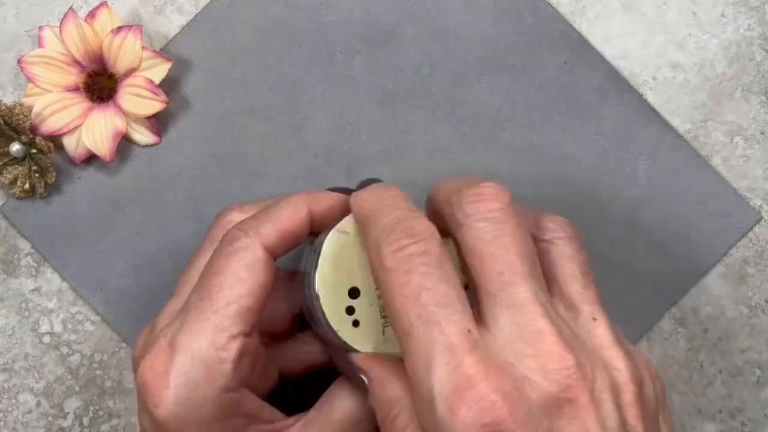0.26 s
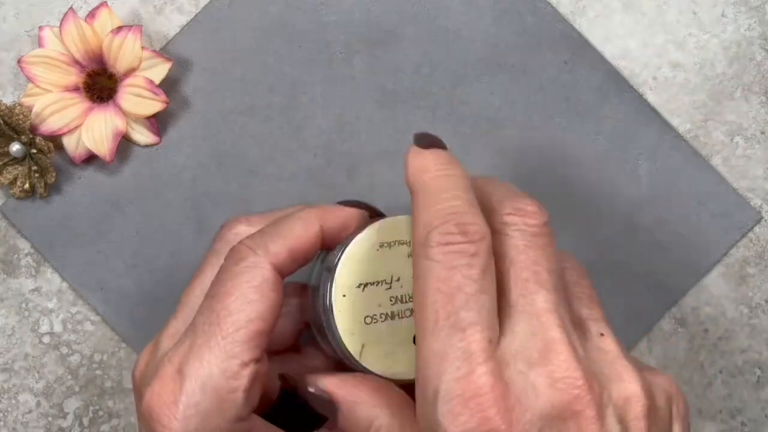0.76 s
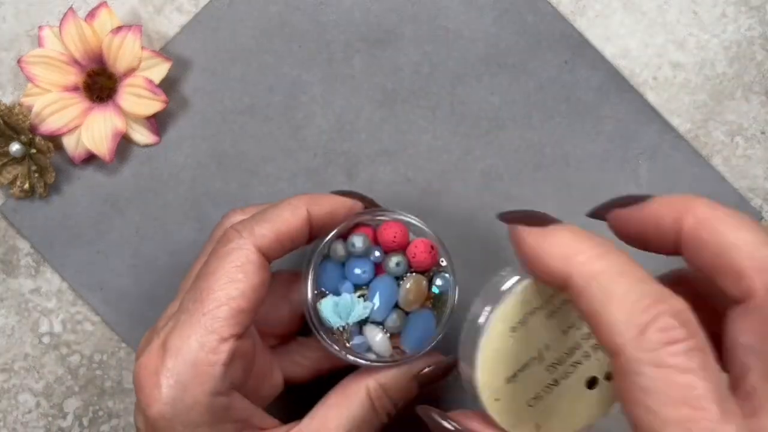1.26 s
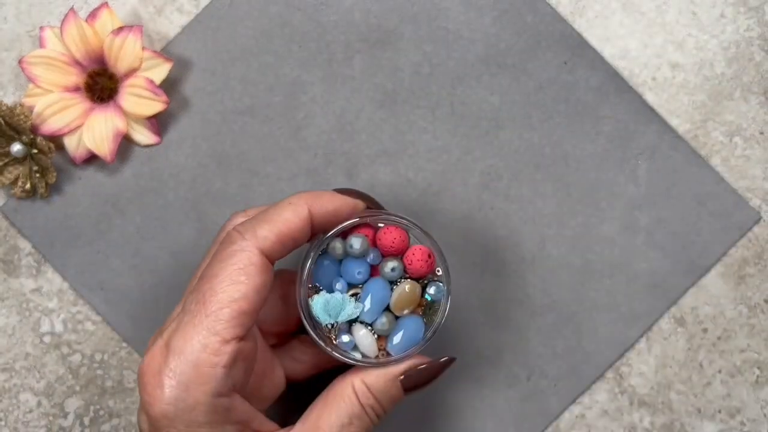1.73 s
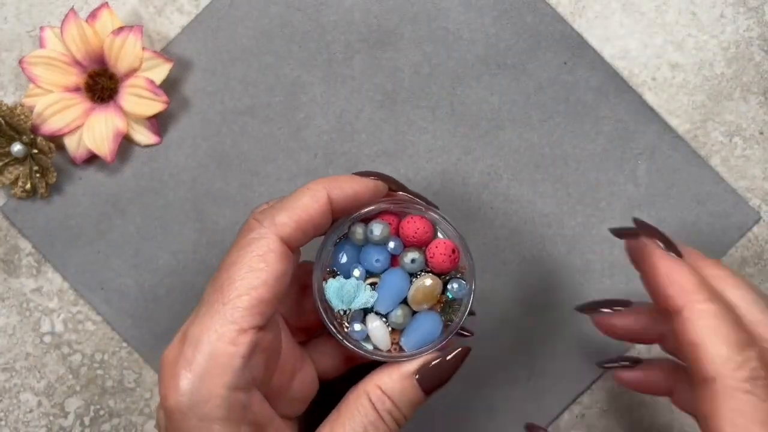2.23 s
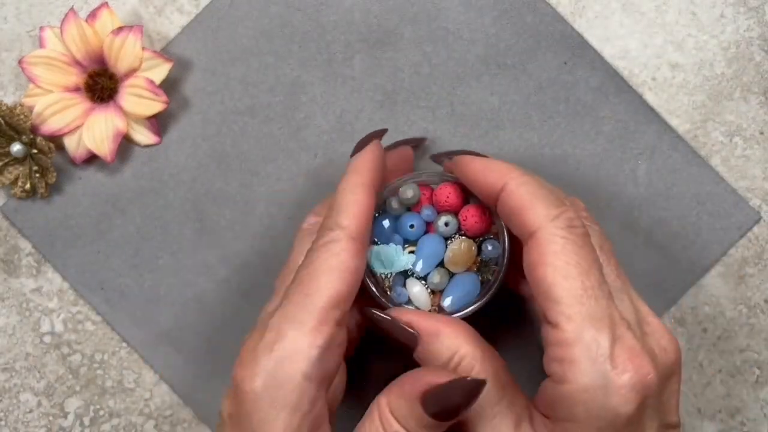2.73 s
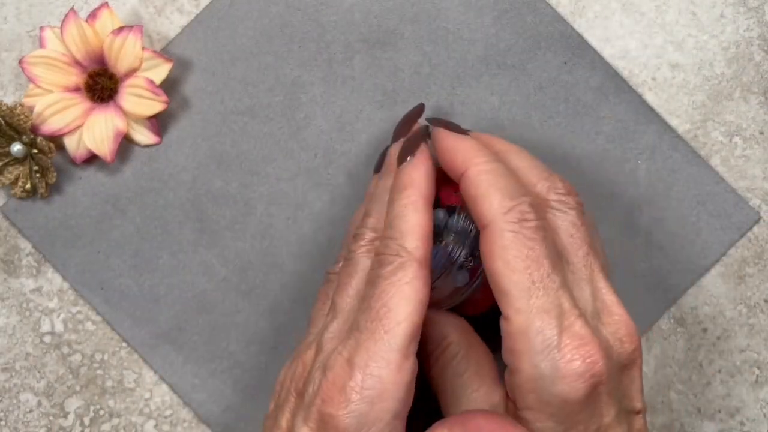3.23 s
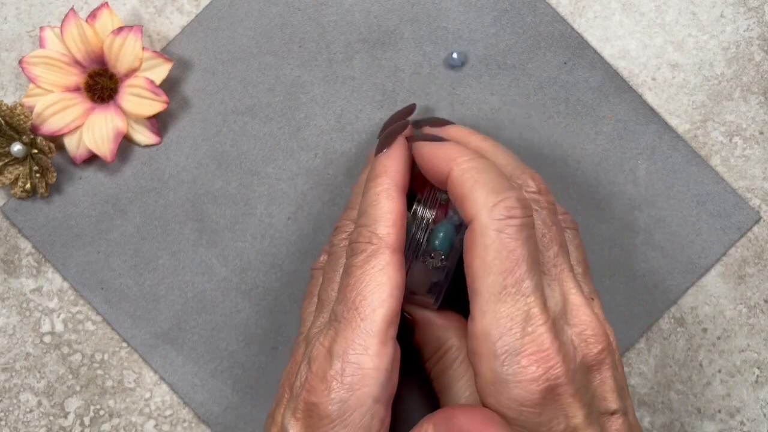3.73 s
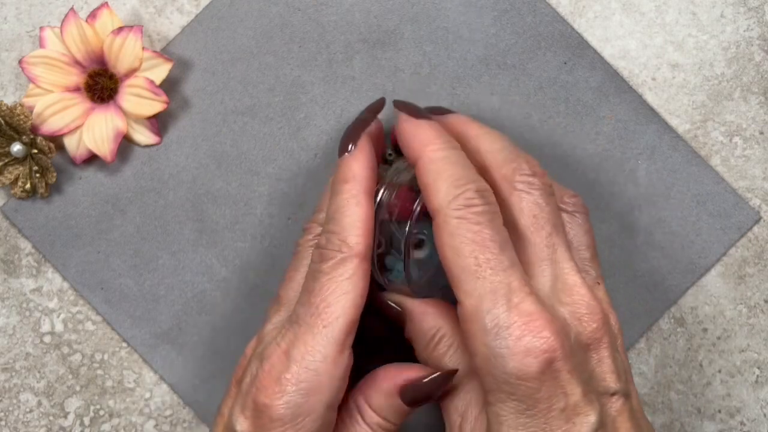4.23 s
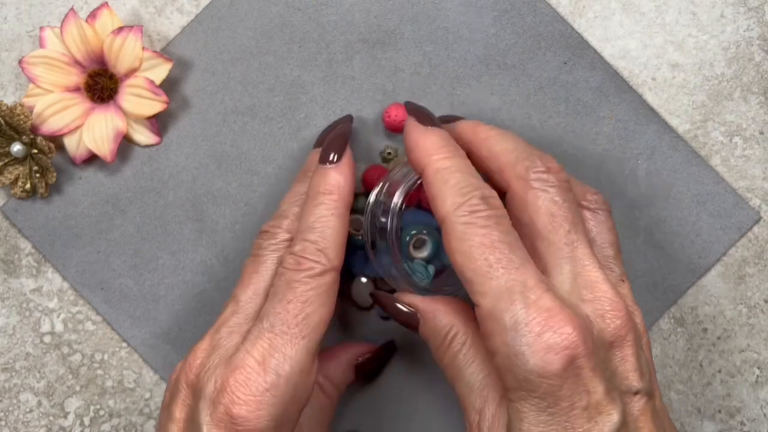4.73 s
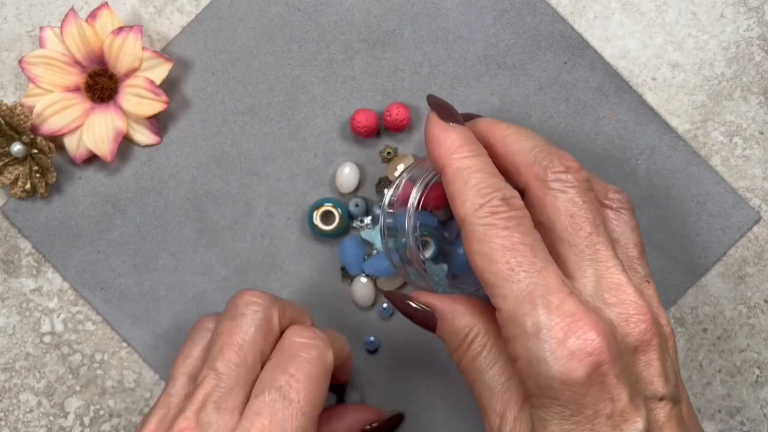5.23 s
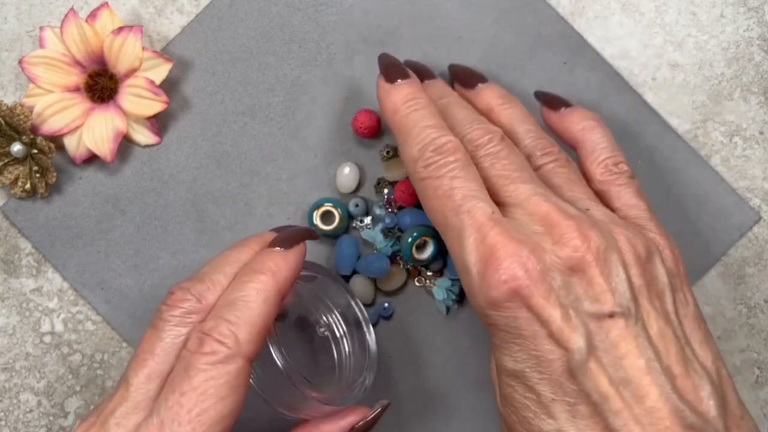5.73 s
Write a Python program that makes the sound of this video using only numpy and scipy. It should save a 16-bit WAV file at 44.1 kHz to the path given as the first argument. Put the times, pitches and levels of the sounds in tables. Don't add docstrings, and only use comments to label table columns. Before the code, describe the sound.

Close to a phone microphone in a quiet furnished room, a hard plastic lid is twisted off with soft grainy rubs, tiny ticks and a faint squeak. The lid then lands loudly twice on the table. Glass and metal beads begin to click in the held jar, rattle harder, pour out in a bright clinking rush, and trickle down to a few dull taps on felt.

```python
import sys
import numpy as np
from scipy import signal
from scipy.fft import rfft, irfft, next_fast_len
from scipy.io import wavfile
from scipy.ndimage import map_coordinates

SR = 44100
rng = np.random.default_rng(int(sys.argv[2]) if len(sys.argv) > 2 else 0)


def decibels_to_gain(level_db):
    exponent = np.asarray(level_db, float) / 20
    return 10 ** exponent


def file_out(sig):
    cols = np.atleast_2d(sig).T
    lim = np.clip(cols, -1, 1)
    pcm = np.round(lim * 32767).astype(np.int16)
    wavfile.write(sys.argv[1], SR, pcm)


N = 263850

# pitch in Hz, level in dB, time to fade by 60 dB in seconds.
JAR_MODES = [
    [(2066, -5.5, 0.038), (2304, -4, 0.063), (3090, 4, 0.028), (3395, -9.5, 0.066)],
    [(4750, -3.5, 0.052), (5190, -2, 0.052), (6020, 5, 0.049)],
    [(6747, -18.5, 0.027), (7610, 4.5, 0.035), (8280, -2, 0.047)],
    [(10570, -0.5, 0.047), (11000, 0.5, 0.025), (13000, -7, 0.023), (13700, -22, 0.021)],
]
FAMILY_DB = [-4.5, 0.26, 2, 0]
# pitch in Hz, relative spread (no unit).
BEAD_BANDS = [(2800, .22), (5100, 0.12), (7600, .12), (12500, 0.15)]
# time in seconds, damping from 0 to 1, lean to lower modes in dB.
GRIP = [(0, 0.6, 6.5), (2.301, 0.7, 7.5), (3.299, 0.5, -0.5), (3.45, 0.4, -1), (3.701, 0, -11),
        (4.05, 0.05, -3), (4.15, 0.3, 6), (4.5, 0.01, 0.5), (5.0, 0.08, 8), (5.201, 0.42, 5.5),
        (5.3, 0.8, -5)]

# start in seconds, peak in dB, hardness in dB per mode family upward.
LID_TICKS = [(0.1272, -38.5, 0), (0.37, -53, -6), (0.428, -58, -4.5), (0.587, -51.5, 5),
             (0.613, -62.5, -16), (0.744, -48.5, 5), (0.7876, -45, -14.5), (0.815, -52, -10),
             (0.975, -44.5, 3), (0.998, -45, -5.5), (1.057, -44.5, 2.5), (1.558, -52.5, 1.5)]
TILTING = [(2.342, -58, -5), (2.351, -52, -4), (2.364, -32.5, -2.5), (2.49, -39, -3), (2.499, -39.5, -3),
           (2.534, -50, -10), (2.574, -44, -6.5), (2.5891, -32.5, 2), (2.707, -45, 4), (2.719, -47, -3),
           (2.763, -51, -5.5), (2.812, -48, -6.5), (2.825, -41, -0.5), (2.845, -37.5, -3),
           (2.906, -32.5, -1.5), (2.962, -33.5, 0), (3.086, -24, 1.5), (3.0936, -32, 4.5), (3.1, -42, 2),
           (3.14, -40.5, 2.5), (3.158, -34.5, -1), (3.1755, -17, 5), (3.2002, -26, 3.5),
           (3.266, -40.5, -0.5), (3.281, -40.5, -4)]
POURING = [(3.381, -48, 7), (3.399, -33.5, -1), (3.449, -42, -2.5), (3.474, -32.5, -4), (3.4936, -43, 9.5),
           (3.5158, -39.5, -5), (3.526, -33, 1.5), (3.54, -17.5, 1), (3.558, -25.5, 1), (3.57, -36, 3.5),
           (3.592, -43, 7.5), (3.605, -40.5, 6.5), (3.624, -39, -1), (3.712, -58.5, -13.5),
           (3.72, -36.5, -6), (3.743, -34, -4.5), (3.7913, -25.5, 4.5), (3.8213, -29, 0),
           (3.85, -36.5, -10.5), (3.8581, -22.5, -2), (3.876, -22, -1.5), (3.8846, -24, 1.5),
           (3.9, -43, -10.5), (3.926, -24, 1.5), (3.938, -17.5, 2.5), (3.997, -45, 4), (4.006, -38, 0.5),
           (4.026, -40, 2), (4.063, -38.5, 4.5)]
SHAKING = [(4.138, -38.5, -1), (4.15, -43.5, 0), (4.162, -40.5, 1.5), (4.1786, -37.5, 1), (4.2, -36.5, -7),
           (4.212, -40.5, 7.5), (4.224, -41.5, 9), (4.239, -37, 4.5), (4.2868, -38, 6.5),
           (4.3219, -35, 2.5), (4.348, -48.5, 4), (4.362, -38.5, 1), (4.422, -46.5, -1), (4.458, -54, 2),
           (4.478, -48, -2)]
SETTLING = [(4.545, -39, 0), (4.572, -46, -3), (4.585, -41, 3.5), (4.614, -43, 6), (4.62, -39, 0.5),
            (4.636, -38.5, 6), (4.662, -45, 2), (4.713, -37, 0.5), (4.725, -49.5, 2), (4.742, -42, 3.5),
            (4.907, -46.5, -0.5), (4.95, -40.5, 2), (5.03, -60, 6.5), (5.055, -52, 3), (5.077, -52, -10),
            (5.1957, -41.5, -7), (5.3202, -49, 7), (5.3222, -46.5, 6), (5.3442, -50.5, 6.5)]

# start in seconds, peak in dB, pitch in Hz.
CLEAR_NOTES = [(2.3665, -36, 4560), (2.4993, -31.5, 6850), (2.5008, -34.5, 4600), (2.5903, -39, 7460),
               (2.825, -37, 4550), (2.8422, -33, 3350), (2.8425, -35, 4600), (2.9053, -29, 3150),
               (2.9059, -29, 7990), (2.9103, -29.5, 5190), (2.9629, -40, 8450), (3.0838, -19.5, 6830),
               (3.0848, -23, 8630), (3.0843, -25, 6160), (3.0921, -25, 6800), (3.0985, -22, 8650),
               (3.1049, -33, 6800), (3.158, -32, 7900), (3.1755, -28, 6270), (3.1766, -28.5, 5030),
               (3.1757, -32, 7700), (3.1759, -23, 11600), (3.1759, -19, 8340), (3.1995, -29.5, 6130),
               (3.1998, -24, 7870), (3.2097, -32, 7600), (3.2237, -31, 8040),
               (3.4002, -28.5, 8210), (3.4005, -30.5, 6410), (3.4729, -31, 6000), (3.4735, -28, 2210),
              (3.4739, -29, 3330), (3.4813, -31, 3560), (3.526, -32, 11430), (3.5309, -33.5, 6200),
              (3.538, -24, 5960), (3.5396, -15.5, 7640), (3.556, -26, 7920), (3.57, -38, 7610),
              (3.57, -31, 8210), (3.5708, -32, 6070), (3.625, -35, 6120), (3.722, -29.5, 6110),
              (3.7351, -32, 6020), (3.743, -26, 6150), (3.7494, -32, 6160), (3.7902, -35, 7370),
              (3.793, -33, 5930), (3.8074, -30, 8300), (3.815, -32, 3110), (3.821, -26, 3130),
              (3.8214, -22.5, 5950), (3.8252, -24, 8290), (3.829, -33.5, 6010), (3.8307, -30, 3150),
              (3.8425, -30, 5990), (3.849, -29, 7400), (3.8498, -27.5, 2200), (3.8588, -11, 3106),
              (3.8596, -11.5, 5970), (3.8753, -18.5, 6020), (3.8823, -20, 3120), (3.883, -20, 7500),
              (3.8843, -22, 6000), (3.889, -40, 5900), (3.8906, -34, 7630), (3.8988, -26, 2210),
              (3.9, -28, 3180), (3.907, -33, 7540), (3.9244, -18.5, 6080), (3.9282, -19, 5940),
              (3.9383, -14, 6030), (3.9533, -29.5, 7500), (3.9681, -37, 5820), (3.9757, -38, 5930),
              (4.0064, -29, 6020), (4.012, -31.5, 6000),
               (4.1387, -38.5, 5900), (4.1512, -35, 8130), (4.1631, -38, 4870), (4.1721, -38, 8520),
               (4.1783, -38, 4950), (4.194, -36, 7940), (4.2008, -38, 3140), (4.2019, -33.5, 4830),
               (4.2111, -37, 8320), (4.2124, -35.5, 2210), (4.2223, -31, 7900), (4.2274, -34, 8000),
               (4.2325, -35, 4900), (4.2378, -35, 8250), (4.2386, -35, 6010), (4.2425, -38, 3150),
               (4.2675, -36, 8400), (4.2855, -35, 7470), (4.2856, -33, 8280), (4.2858, -37, 5900),
               (4.2858, -34, 10700), (4.3217, -32, 7530), (4.3612, -40, 7400), (4.5476, -37, 10760),
               (4.5491, -36, 7650), (4.5705, -39, 2200), (4.5861, -35, 10700), (4.6133, -32, 7570),
               (4.6136, -36, 8340), (4.623, -34, 10640), (4.6294, -34, 2010), (4.6378, -29.5, 8060),
               (4.6607, -39, 4760), (4.7128, -36, 7630), (4.7132, -34, 2020), (4.7145, -40, 4750),
               (4.743, -37.5, 7600), (4.7439, -41, 10500), (4.7442, -40, 4740), (5.1958, -25, 3060),
               (5.196, -33.5, 2700),
               (2.532, -40, 3500), (4.545, -37.5, 2060), (4.561, -41, 1850), (4.585, -39.5, 2020),
              (4.621, -40, 1960), (5.198, -33, 7550), (5.196, -35.5, 5900), (5.196, -37, 4800),
              (5.196, -32, 2190), (0.78, -33, 3250), (.788, -37, 2800), (5.1965, -44, 10460),
              (5.2345, -47.5, 2150), (5.233, -41, 3070)]
# pitch in Hz, time to fade by 60 dB in seconds.
NOTE_T60 = [(2000, 0.025), (3100, 0.032), (4700, 0.034), (6000, 0.039), (8000, 0.026), (11000, 0.021)]

# peak in seconds, swell in seconds, fade in seconds, level in dB, brightness in dB.
SURGES = [(2.385, 0.074, 0.048, -60.5, 8.5), (2.52, 0.054, 0.15, -64.5, 0),
          (2.72, 0.16, 0.0535, -62.5, 5.5), (2.83, 0.14, 0.074, -62.5, 2), (2.909, 0.012, 0.04, -44.5, 2.5),
          (2.99, 0.066, 0.024, -50.5, 8), (3.105, 0.08, 0.029, -48.5, 8), (3.22, 0.3, 0.11, -48.5, 6),
          (3.4, 0.07, 0.09, -50, 6.5), (3.48, 0.11, 0.19, -45.5, 1.5), (3.58, 0.3, 0.047, -54.5, 9),
          (3.735, 0.017, 0.22, -53, 3), (3.81, 0.2, 0.3, -45, 4.5), (3.9, 0.14, 0.16, -37, 3.5),
          (4.03, 0.067, 0.19, -50.5, 1.5), (4.15, 0.012, 0.13, -56.5, 7), (4.23, 0.15, 0.086, -44.5, 1.5),
          (4.31, 0.055, 0.12, -59, 1), (4.56, 0.061, 0.072, -51, 1.5), (4.64, 0.18, 0.087, -50, 6.5),
          (4.73, 0.051, 0.048, -52.5, 2), (5.21, 0.016, 0.12, -63, -5.5), (4.3, 0.7, 1.8, -67.5, -1.5)]
# peak in seconds, swell in seconds, fade in seconds, level in dB.
CUPPED = [
    (3.1, 0.067, 0.28, -57.5),
    (3.43, 0.11, .1, -50.5),
    (3.54, .12, 0.11, -48.5),
]
# pitch in Hz, level in dB, time to fade by 60 dB in seconds.
CUPPED_MODES = [(2210, -1, 0.034), (3700, -2, 0.023)]
# frequency in Hz, level in dB per Hz.
SCRAPE_COLOUR = [(710, -61), (1200, -18.5), (2000, -11), (3900, -14), (8080, -7), (14000, -12.5),
                 (16000, -24.5)]
FELT_COLOUR = [(150, -34), (400, -4), (1050, 9.5), (1600, -6.5), (2600, -28.5), (5000, -120)]

# start in seconds, peak in dB, pitch in Hz.
KNOCKS = [(0.368, -39, 600), (0.4105, -40.5, 1500), (0.4696, -33.5, 890), (0.53, -42, 980),
          (0.586, -35.5, 1080), (0.613, -37, 950), (.778, -41, 694), (0.785, -31.5, 963), (0.815, -33, 850),
          (0.944, -47, 374), (2.903, -32, 410), (3.513, -33, 1080), (3.939, -25, 967), (4.02, -36.5, 1000),
          (4.228, -37.5, 634), (4.325, -39.5, 576), (4.63, -41.5, 1710), (4.821, -32.5, 737)]
# start in seconds, level in dB, pitch in Hz.
THUMPS = [
    (2.9015, -33, 107),
    (3.108, -37.5, 86),
    (4.821, -41, 270),
]

# peak in seconds, swell in seconds, fade in seconds, level in dB, brightness in dB.
TURNS = [(0, .05, 0.069, -64, -2), (.065, 0.028, 0.024, -59.5, -0.5), (.13, 0.042, 0.069, -49, 0.5),
         (.17, .04, 0.045, -46, 2), (.205, 0.035, 0.041, -44, -0.5), (.375, 0.02, 0.03, -62.5, 4),
         (.43, 0.028, 0.035, -61, -3.5), (.49, 0.025, 0.075, -61, 1.5), (.55, 0.17, 0.089, -51.5, 1),
         (.6, 0.051, 0.011, -58.5, -1), (.74, 0.036, 0.041, -62, 1), (.8, 0.038, 0.062, -57, -2),
         (.89, 0.076, 0.097, -61, 1), (.97, 0.12, 0.096, -60, 1.5), (1.06, 0.096, 0.048, -60, 6)]
# frequency in Hz, level in dB per Hz.
THREAD_DULL = [(210, -41), (350, -3.5), (935, 1.5), (1260, -7), (1580, -8.5), (2320, -4.5), (4500, -14.5),
               (9900, -120)]
THREAD_BRIGHT = [(2350, -27.5), (4000, -14.5), (6110, -3), (7700, -2.5), (10200, -9), (11700, -5),
                 (15100, -14), (16000, -22.5)]
# pitch in Hz, level in dB, time to fade by 60 dB in seconds.
THREAD_MODES = [(950, -10, 0.035), (2316, 0, 0.025), (2890, -1, 0.022), (3405, -2, .025), (6120, -4, 0.022)]
# time in seconds, pitch in Hz, level in dB.
SQUEAK = [(0.198, 1663, -52), (0.203, 1540, -45), (0.222, 710, -42), (0.225, 596, -41.5), (.24, 595, -79),
          (.945, 1550, -70), (.96, 1624, -59), (.975, 1776, -55.5), (0.991, 2290, -63), (1.003, 2130, -54),
          (1.01, 2000, -66)]

# (pitch in Hz, level in dB, time to fade by 60 dB in seconds).
LANDINGS = [
    (1.7246, -0.5, -14, [(2055, -13.5, 0.02), (2310, -15.5, 0.054), (2650, -13, 0.04), (2890, -6.5, 0.035), (3150, -6, 0.025), (3388, 2, 0.031), (5120, -15.5, 0.05), (5315, -5.5, 0.03), (5950, -1.5, 0.028), (6050, -7.5, 0.08), (7620, -17, .04), (8450, -20, 0.031), (9600, -15, 0.023), (850, -31, 0.034)]),
    (1.818, -4.5, -5.5, [(526, -19.5, 0.026), (900, -11.5, 0.025), (1520, -7.5, 0.02), (2080, -7, 0.014), (3330, -10, 0.029), (6170, -0.5, 0.037), (7480, -9, 0.041), (8450, -11, 0.055), (9850, -10, 0.034), (10840, -1.5, 0.014), (12400, -12.5, 0.033), (13770, -9.5, 0.024)]),
]
# pitch in Hz, level in dB, time to fade by 60 dB in seconds.
LINGER = [(3340, -43.5, 0.33), (6180, -39, .28)]
# peak in seconds, swell in seconds, fade in seconds, level in dB.
SLIDE = [
    (1.285, 0.036, 0.05, -70),
    (1.425, 0.14, 0.024, -65.5),
]

# peak in seconds, swell in seconds, fade in seconds, level in dB.
BRUSH = [
    (1.25, .25, 0.43, -73),
    (1.45, 0.17, 0.1, -73.5),
    (5.69, 0.053, .05, -67.5),
    (5.92, 0.064, 0.12, -65),
]
# peak in seconds, swell in seconds, fade in seconds, level in dB.
LOW_SWELLS = [
    (2.2, 0.7, 0.94, -68.5),
    (5.5, 0.52, 0.7, -69),
]
# time in seconds, appliance murmur in dB, rumble in dB.
AIR = [(0.0, -64, -55.5), (1.6, -66.5, -54), (2.2, -63.5, -50), (3.1, -65.5, -57), (5.03, -62.5, -54.5),
       (5.98, -67.5, -53.5)]
# frequency in Hz, level in dB per Hz.
MURMUR_COLOUR = [(35, -31), (56, 4), (68, -15), (123, -5), (188, -14.5), (238, -7), (450, -16), (2000, -46)]
RUMBLE_COLOUR = [(2.9, -27), (5.0, 3.5), (18, 0.5), (52, -16), (75, -27), (90, -21), (120, -51.5),
                 (200, -120)]
HISS_COLOUR = [(410, -34), (700, -12), (1680, -14.5), (3330, -20), (6280, -21.5), (15000, -24.5),
               (16500, -41.5)]
# frequency in Hz, time to fade by 60 dB in seconds.
ROOM_T60 = [(300, 0.24), (2000, 0.34), (6000, 0.29), (14000, 0.081)]


def unit(x):
    return x / np.sqrt(np.mean(x ** 2) + 1e-20)


def along(points, hz):
    f, v = np.transpose(points)
    return np.interp(np.log(hz + 1), np.log(f + 1), v)


def curves(rows):
    s, *columns = np.transpose(rows)
    return [decibels_to_gain(np.interp(np.arange(N) / SR, s, db, -140, -140)) for db in columns]


def filtered(x, response):
    m = next_fast_len(N + 8192)
    return irfft(rfft(x, m) * response(np.fft.rfftfreq(m, 1 / SR)), m)[:N]


def bandpass(x, low_hz, high_hz):
    return signal.sosfilt(signal.butter(2, [low_hz, high_hz], "bandpass", fs=SR, output="sos"), x)


def coloured(x, spectrum):
    return unit(filtered(x, lambda hz: decibels_to_gain(along(spectrum, hz))))


def grit(spread_db, per_s):
    hits = rng.random(N) < per_s / SR
    sizes = decibels_to_gain(spread_db * np.minimum(rng.exponential(size=N), 3.5))
    return hits * rng.standard_normal(N) * sizes


def clumps(depth_db, per_s):
    points = rng.standard_normal(int(N * per_s / SR) + 4)
    return decibels_to_gain(depth_db * map_coordinates(points, [np.arange(N) * per_s / SR]))


def swells(rows, lean=0):
    t, power = np.arange(0, N, 32) / SR, 0
    for s, swell, fade, db, *bright_db in rows:
        away = np.where(t < s, (s - t) / swell, (t - s) / fade)
        power = power + decibels_to_gain(db + lean * sum(bright_db) - 32 * away ** 1.55) ** 2
    return np.interp(np.arange(N) / SR, t, np.sqrt(power))


def struck(x, modes):
    def response(f):
        total = 0
        for k, (hz, db, t60) in enumerate(modes):
            width = np.log(1000) / np.pi / t60
            total = total + (-1) ** k * decibels_to_gain(db) * 1j * f / (hz * hz - f * f + 1j * f * width)
        return total
    return unit(filtered(x, response))


def ring(modes, t, scatter_db, detune, attack):
    hz, db, t60 = np.transpose(modes)[:, :, None]
    strength, shift, phase = rng.standard_normal((3, len(modes), 1))
    decay = decibels_to_gain(db + scatter_db * strength - 60 * t / t60)
    tones = decay * np.sin(2 * np.pi * hz * (1 + detune * shift) * t + 0.97 * phase)
    return tones.sum(0) * (1 - np.exp(-t / attack))


def leaned(modes, damping, lean_db):
    side = np.linspace(1, -1, len(modes))
    return [(hz, db + lean_db * k, t60 * (1 - 0.75 * damping)) for (hz, db, t60), k in zip(modes, side)]


def hand_on_jar(s):
    when, damping, lean_db = np.transpose(GRIP)
    return np.clip(np.interp(s, when, damping), 0, 1), np.interp(s, when, lean_db)


def add(track, s, x):
    track[round(s * SR):][:len(x)] += x


def clinks():
    out, t = np.zeros(N + SR), np.arange(SR // 24) / SR
    brief = t[:SR // 40]
    for s, peak_db, hardness in LID_TICKS + TILTING + POURING + SHAKING + SETTLING:
        family_db = peak_db + np.array(FAMILY_DB) + hardness * np.linspace(-1.5, 1.5, len(JAR_MODES))
        damping, lean_db = hand_on_jar(s)
        for db, modes, (hz, spread) in zip(family_db, JAR_MODES, BEAD_BANDS):
            held = leaned(modes, 0.21 + 0.6 * damping, lean_db)
            tone = ring(held, t, scatter_db=3.0, detune=0.0093, attack=0.00046)
            bead = ring([(hz, 0, 0.016)] * 7, brief, scatter_db=4.5, detune=spread, attack=0.00021)
            add(out, s, decibels_to_gain(db - 5.5) * (1 - damping) * tone / np.abs(tone).max())
            add(out, s, decibels_to_gain(db + 2.0) * (0.48 + 0.45 * damping) * bead / np.abs(bead).max())
    return out[:N]


def notes():
    out, t = np.zeros(N + SR), np.arange(SR // 20) / SR
    for s, db, hz in CLEAR_NOTES:
        damping, _ = hand_on_jar(s)
        t60 = along(NOTE_T60, hz) * (1 - 0.65 * damping)
        note = ring([(hz, 0, t60)], t, scatter_db=0.5, detune=0, attack=0.00054)
        add(out, s - 0.0004, decibels_to_gain(db + 2) * note)
    return out[:N] * clumps(depth_db=0.8, per_s=370)


def rattle():
    wall, rim, bright = swells(SURGES, -1.2), swells(SURGES), swells(SURGES, 0.72)
    bunch = clumps(depth_db=3.5, per_s=150)
    taps = bunch * grit(spread_db=1.5, per_s=1200)
    scrape = coloured(bunch * grit(spread_db=1.0, per_s=4100), SCRAPE_COLOUR)
    damping, lean_db = hand_on_jar(np.arange(N) / SR)
    free = 1 - damping
    lower = 1 / (1 + decibels_to_gain(-1.5 * lean_db))

    def tone(modes, db):
        force = taps * clumps(depth_db=5.5, per_s=27) * rng.standard_normal(N)
        return struck(force, leaned(modes, 0.56, db))

    wall_ring, rim_ring = (lower * tone(modes, 8.3) + (1 - lower) * tone(modes, -2.0)
                           for modes in JAR_MODES[:2])
    glassy = tone(JAR_MODES[2], 0) + decibels_to_gain(-1.5) * tone(JAR_MODES[3], 0)
    jar = decibels_to_gain(3.5) * wall * wall_ring + decibels_to_gain(5.5) * rim * rim_ring + decibels_to_gain(-1.5) * bright * glassy
    out = swells(CUPPED) * struck(taps * clumps(depth_db=2.5, per_s=45), CUPPED_MODES)
    out += decibels_to_gain(-1.5) * free * jar
    out += decibels_to_gain(1.5 - 3.5 * free) * bright * scrape
    return out + decibels_to_gain(-13) * wall * coloured(taps, FELT_COLOUR)


def knocks():
    out, t = np.zeros(N + SR), np.arange(SR // 8) / SR
    for s, db, hz in KNOCKS:
        puff = bandpass(decibels_to_gain(-60 * t / 0.022) * rng.standard_normal(len(t)), 0.42 * hz, 1.46 * hz)
        add(out, s, decibels_to_gain(db - 4.0) * puff / np.abs(puff).max())
    for s, db, hz in THUMPS:
        add(out, s, -decibels_to_gain(db) * ring([(hz, 0, 0.05)], t, scatter_db=1.5, detune=0, attack=0.002))
    return out[:N]


def twist():
    dull, bright = swells(TURNS, -1.36), swells(TURNS, 0.9)
    judder = clumps(depth_db=2.5, per_s=120)
    rub = dull * coloured(judder * grit(spread_db=3.5, per_s=3500), THREAD_DULL)
    rub += bright * coloured(judder * grit(spread_db=-0.5, per_s=8200), THREAD_BRIGHT)
    catches = judder * clumps(depth_db=3.0, per_s=36) * grit(spread_db=1.5, per_s=1500)
    rub += decibels_to_gain(-0.5) * dull * struck(catches, THREAD_MODES)
    s, hz, db = np.transpose(SQUEAK)
    phase = 2 * np.pi * np.cumsum(np.interp(np.arange(N) / SR, s, hz)) / SR
    squeak_gain = curves(list(zip(s, db)))[0]
    return rub + squeak_gain * clumps(depth_db=4.5, per_s=350) * np.sin(phase)


def lid():
    out, t = np.zeros(N + SR), np.arange(SR // 3) / SR
    for s, db, crack_db, modes in LANDINGS:
        crack = decibels_to_gain(crack_db - 60 * t / 0.029) * np.diff(rng.standard_normal(len(t) + 1))
        body = struck(rng.standard_normal(N), leaned(modes, 1.1, 0))[SR:][:len(t)]
        body *= decibels_to_gain(-3.5 - 60 * t / 0.03) + decibels_to_gain(-21.5 - 60 * t / 0.27)
        body += bandpass(rng.standard_normal(len(t)), 1100, 5500) * decibels_to_gain(-17 - 60 * t / 0.14)
        blow = ring(modes, t, scatter_db=1.5, detune=0, attack=0.0005)
        blow += (crack + body) * (1 - np.exp(-t / 0.00016))
        blow = decibels_to_gain(db) * blow / np.abs(blow).max()
        add(out, s, blow)
        add(out, s + 0.0068, decibels_to_gain(-17.5) * blow)
    add(out, s, ring(LINGER, t, scatter_db=0.5, detune=0, attack=0.002))
    singing = struck(rng.standard_normal(N), [(3227, 5.0, 0.022), (6120, 2, 0.023)])
    return out[:N] + swells(SLIDE) * singing


def room(x):
    hz, t, z = signal.stft(rng.standard_normal(SR // 2), SR, nperseg=256)
    fading = z * decibels_to_gain(-60 * t / along(ROOM_T60, hz)[:, None])
    tail = signal.istft(fading, SR, nperseg=256)[1]
    late = np.pad(x, (250, 0))
    return signal.fftconvolve(late, tail / np.linalg.norm(tail))[:N]


def background():
    murmur, rumble = curves(AIR)
    noise = rng.standard_normal((5, N))
    out = decibels_to_gain(-69.5) * coloured(noise[0], HISS_COLOUR)
    out += decibels_to_gain(0.5) * murmur * coloured(noise[1], MURMUR_COLOUR)
    out += decibels_to_gain(5.0) * rumble * coloured(noise[2], RUMBLE_COLOUR)
    out += swells(BRUSH) * coloured(noise[3], THREAD_BRIGHT)
    return out + swells(LOW_SWELLS) * unit(bandpass(noise[4], 330, 560))


def scene():
    beads = clinks() + notes() + rattle() + knocks() + twist()
    drop = lid()
    answer = decibels_to_gain(-14.5) * room(beads) + decibels_to_gain(-15.0) * room(drop)
    return (beads + drop + answer + background())[None]


def low_pass(x):
    return signal.sosfilt(signal.butter(12, 17030, fs=SR, output="sos"), x)


def record(dry):
    mix = filtered(dry[0], lambda hz: np.where(hz < 15800, 1, decibels_to_gain(-22.5)))[None]
    return low_pass(mix)


dry = scene()
out = record(dry)
file_out(out)
```